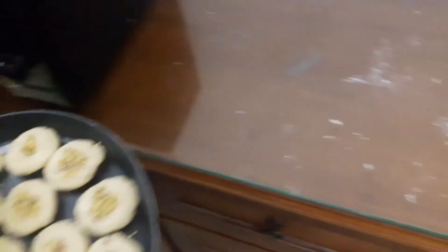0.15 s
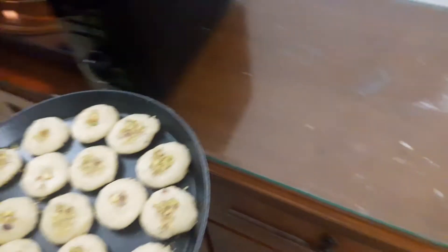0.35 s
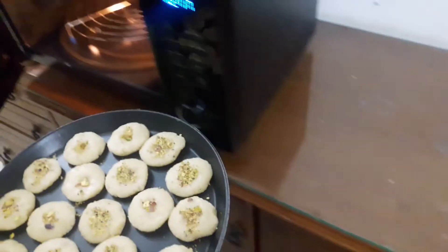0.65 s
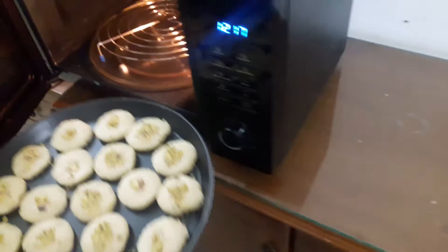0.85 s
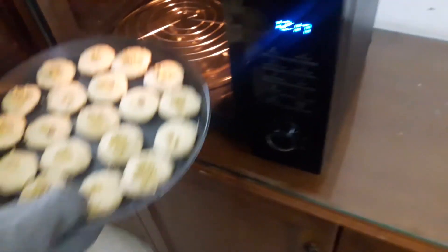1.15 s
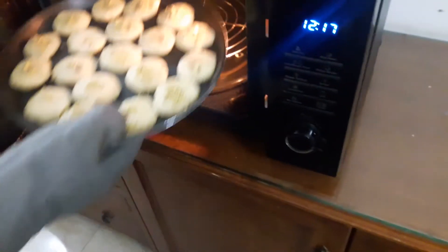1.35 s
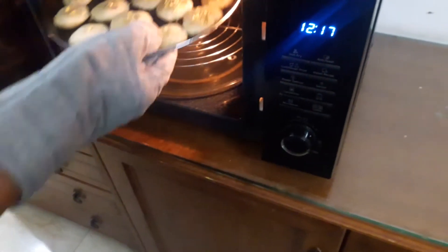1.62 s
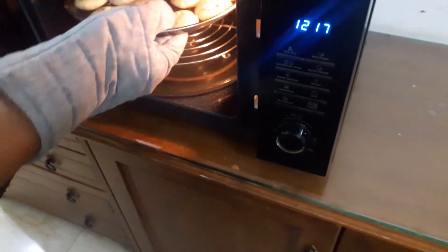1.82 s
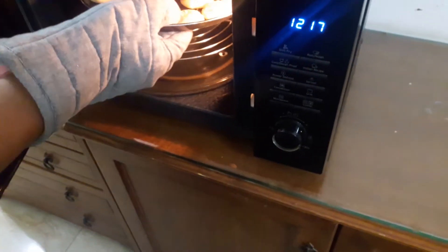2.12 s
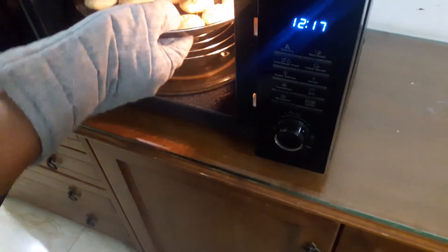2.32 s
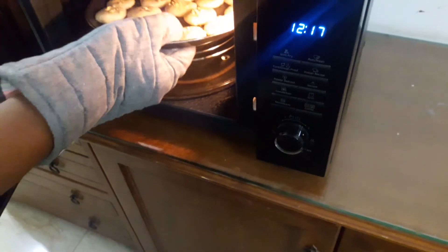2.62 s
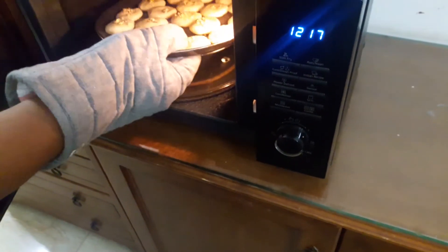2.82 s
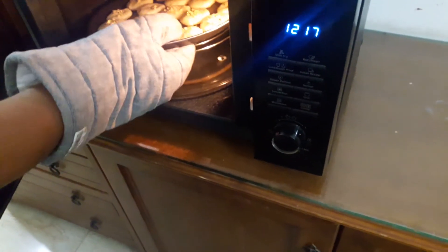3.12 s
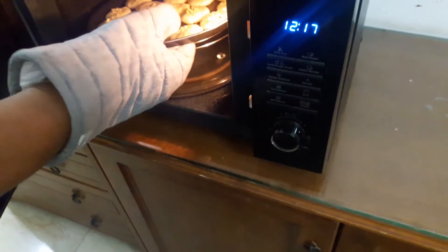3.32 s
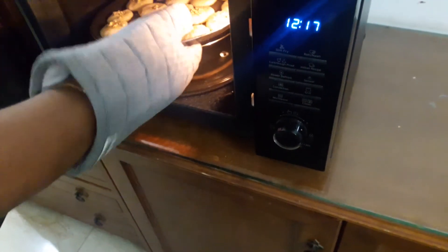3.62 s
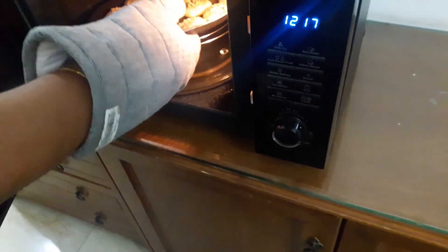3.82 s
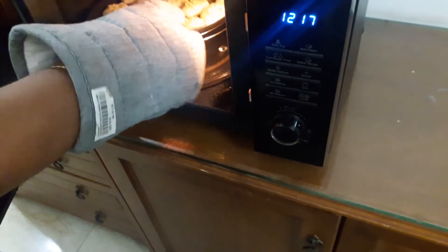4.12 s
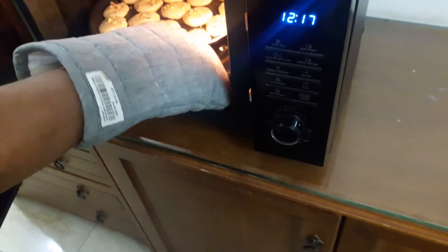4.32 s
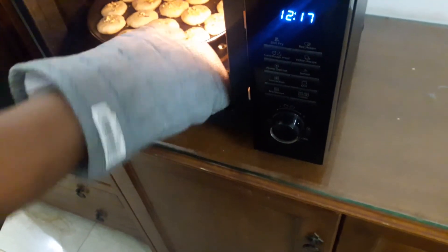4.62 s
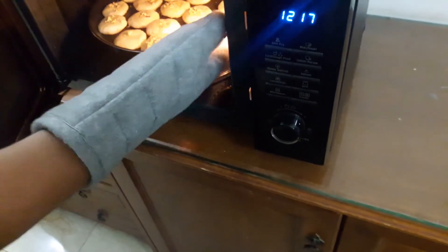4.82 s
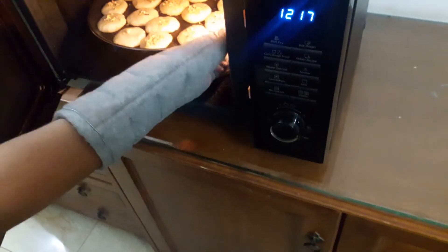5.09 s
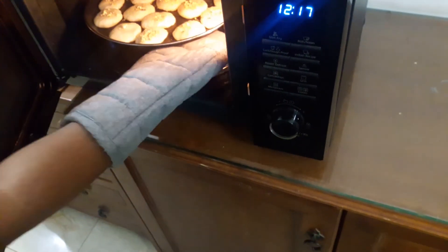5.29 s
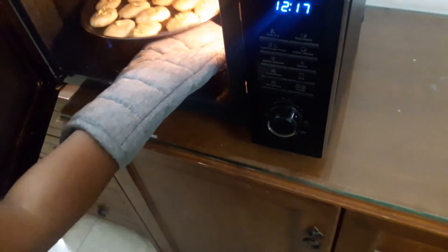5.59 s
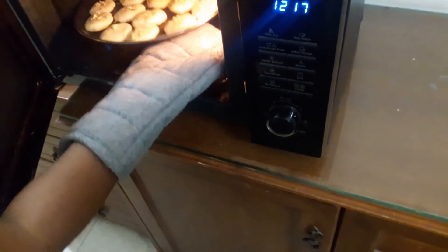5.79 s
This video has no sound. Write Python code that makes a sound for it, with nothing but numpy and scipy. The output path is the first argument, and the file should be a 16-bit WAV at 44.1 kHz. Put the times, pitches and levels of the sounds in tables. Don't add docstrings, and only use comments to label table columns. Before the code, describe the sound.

Dull hollow thumps and rustling cloth, then a metal tray knocks, clanks and scrapes onto a wire rack inside an oven in a hard-walled kitchen.

```python
import sys
import numpy as np
from scipy import signal
from scipy.io import wavfile
from scipy.ndimage import uniform_filter1d

SR = 44100
rng = np.random.default_rng(int(sys.argv[2]) if len(sys.argv) > 2 else 0)


def master_out(mix):
    frames = np.transpose(np.atleast_2d(mix))
    ceiling = np.clip(frames, -1, 1)
    pcm = np.round(ceiling * 32767).astype(np.int16)
    wavfile.write(sys.argv[1], SR, pcm)


def volts_from_decibels(level):
    exponent = np.asarray(level, float) / 20
    return 10 ** exponent


N = 262395
T = np.arange(N) / SR

# start_s, crack_db, crack_pitch_hz, clank_db, rattle_t60_s
KNOCKS = [(2.8035, -45, 2000, -25, 0.19), (2.814, -12, 4700, -36, 0.091), (2.9228, -33, 3500, -27, 0.049),
          (2.9643, -11.5, 4500, -24.5, 0.088), (3.692, -43, 5040, -43, .088),
          (3.7162, -33, 2350, -30, 0.056), (3.7258, -35, 2460, -47, 0.12), (3.7507, -41, 3480, -57, .04),
          (4.3362, -32, 2070, -37, 0.11), (4.3646, -34, 3900, -28, 0.024), (4.378, -14, 3600, -23.5, 0.019),
          (4.3852, -21, 3270, -41, 0.067), (4.3999, -26, 2270, -27, 0.044),
          (5.279, -18, 2160, -20.5, 0.086), (5.781, -39, 4750, -40, 0.027), (5.7871, -36, 3480, -33, 0.067),
          (5.7961, -36, 3580, -22, 0.086)]
# pitch_hz, level_db, t60_s
TRAY_MODES = [(382, -4, 0.25), (584, -9, 0.12), (680, -34, 0.21), (900, -16, 0.1), (980, -5, 0.27),
              (1112, -16, 0.1), (1184, 3, 0.82), (1240, 5, 0.54), (1410, -18, 0.1), (1590, -9, 0.15),
              (1900, -1, 0.19), (2190, -5, 0.1), (2270, 4, 0.18), (2300, -5, .2), (2680, -34, .12),
              (3220, -18.5, 0.22), (3480, 8, 0.14), (4200, -21, 0.14), (4500, -30, .3), (5270, -34, .15),
              (5070, -9, 0.12)]
# start_s,
# level_db, pitch_hz, width_hz, t60_s
REBOUNDS = [(.252, -39, 500, 500, .06), (.303, -40, 5500, 2000, .02), (.4265, -42, 2200, 600, 0.017),
            (.427, -33, 500, 600, .03), (.8935, -30, 4000, 2500, .05), (4.366, -31, 400, 250, 0.068),
            (4.384, -24, 327, 251, 0.085), (5.782, -33, 4840, 900, .03), (2.344, -50, 990, 900, 0.036),
            (2.8178, -11, 4430, 2450, .035), (2.85, -33, 4960, 1500, .05), (2.875, -36, 3300, 900, .04),
            (2.931, -29, 3100, 1200, 0.059), (3.0043, -28, 2630, 1800, .04), (3.012, -36, 4600, 1200, .04),
            (3.687, -48, 3500, 600, .05), (3.6908, -42.5, 1000, 500, 0.091),
            (3.7135, -35, 2200, 1500, 0.022), (3.7235, -29.5, 900, 900, 0.02),
            (3.728, -30.5, 1300, 1500, 0.034), (3.747, -42, 1300, 900, .04),
            (3.775, -44.5, 1300, 700, 0.05), (4.33, -39, 1100, 900, .04), (4.3443, -33, 2100, 600, .04),
            (4.358, -33, 1100, 600, 0.035), (4.392, -26, 3300, 700, 0.029), (4.402, -34, 1150, 500, .05),
            (4.41, -34.5, 3520, 600, 0.044), (4.428, -32, 2280, 700, 0.045), (4.445, -38, 3270, 900, 0.037),
            (5.283, -22, 2500, 3500, 0.019), (5.768, -40.5, 600, 400, 0.054),
            (5.7875, -25, 950, 700, 0.027), (5.79, -33, 2290, 600, 0.038), (5.7975, -29, 1290, 2450, 0.016),
            (5.834, -46, 3500, 500, 0.034), (.828, -47, 1400, 1400, .15), (4.387, -22, 3500, 900, .04),
            (5.085, -50, 1500, 1200, .08)]
# start_s, pitch_hz, level_db, t60_s
WIRES = [(.11, 3400, -54.5, 0.17), (0.13, 6300, -49, 0.07), (2.814, 1112, -28, 0.14),
         (2.966, 4500, -43, 0.22), (2.817, 2270, -32.5, 0.13), (2.818, 3310, -32, 0.13),
         (2.818, 4560, -27.5, 0.09), (2.966, 3060, -34, 0.083), (2.925, 1500, -45, .08),
         (3.716, 1750, -45, 0.064), (3.716, 4300, -49, .08), (3.69, 4950, -47, .08),
         (3.721, 1179, -46, 0.32), (3.73, 1410, -53, 0.33), (4, 790, -59, 0.072), (3.72, 985, -45, 0.19),
         (4.366, 3920, -26.5, 0.035), (4.38, 3620, -23.5, 0.038), (4.38, 2261, -41, 0.3),
         (4.365, 630, -38, 0.47), (4.385, 3144, -40, .24), (4.38, 921, -47, 0.61),
         (4.39, 3413, -43.5, 0.32), (4.38, 2700, -38, 0.34), (3.72, 436, -45.5, .3),
         (3.72, 2283, -52, 0.23), (3.72, 3456, -49, .17), (3.73, 3500, -53, .12), (3.755, 4958, -54, .1),
         (5.8, 1300, -43, .6), (5.79, 2000, -41, .2), (5.868, 2300, -50, .3), (5.79, 3500, -44, .2),
         (3.69, 2300, -50, .08), (3.675, 1400, -52, .12), (2.83, 5500, -42, .2), (2.84, 3320, -42, .2),
         (2.98, 2650, -42, .2), (5.283, 2250, -44, .25), (5.283, 3500, -44, .2), (5.81, 300, -42, 0.17),
         (5.8, 330, -43, 0.18), (5.33, 1350, -47.5, 0.28), (4.38, 1179, -36.5, 0.29),
         (4.383, 377, -34.5, 0.3), (5.279, 1270, -33.5, 0.071), (5.786, 5000, -43, 0.057),
         (5.8, 1227, -38.5, 0.59), (5.796, 2050, -58, 0.15), (5.797, 3600, -36, 0.035),
         (5.798, 390, -39.5, 0.21), (5.798, 1712, -38, 0.096), (4.385, 1577, -43, 0.16)]
# start_s, held_s, scrape_db, cavity_db, clank_db
SLIDES = [(2.829, 0.0034, -38.5, -38, -36), (2.888, 0.04, -54, -36, -49), (2.956, 0.065, -47, -40.5, -42),
          (3.55, 0.11, -68, -66.5, -63.5), (3.69, 0.015, -64, -68, -52), (3.714, 0.028, -65, -49.5, -56),
          (3.85, 0.055, -71, -73, -71), (4.335, 0.015, -41.5, -38.5, -35),
          (4.365, 0.0052, -40.5, -33.5, -41), (4.43, .01, -56, -45.5, -52),
          (5.295, 0.0026, -68, -41.5, -43.5), (5.41, .12, -67, -56.5, -63.5),
          (5.799, 0.0024, -58, -40, -42.5), (5.87, 0.1, -67, -73, -67)]
# pitch_hz, density_db_per_hz
CLANK_COLOUR = [(350, -26.5), (600, 1.5), (786, -8.5), (922, 0), (1050, -6), (1140, -2.5), (2600, -16.5),
                (3380, -68), (5720, -120)]
# pitch_hz, density_db_per_hz
SCRAPE_COLOUR = [(1410, -61), (2400, 3.5), (3380, 5), (3930, 2), (5310, 4.5), (6670, -14), (8300, -31),
                 (10800, -48), (18300, -120)]
# pitch_hz, width_hz, level_db
RACK_WIRES = [(2270, 58, 6), (2480, 60, -8), (3020, 57, -7), (3500, 42, 0), (3750, 16, -4), (4470, 80, -5),
              (5100, 40, -8)]
# pitch_hz, width_hz, level_db
CAVITY = [(94, 36, -10), (153.5, 10.8, 4), (213.7, 46.6, 1), (252.6, 25, -8), (320, 39, 1.5), (383, 41, -2),
          (488, 71, -10), (618.5, 38, -10.5)]
# start_s, level_db, pitch_hz, fizz_share, t60_s
TICKS = [(0.108, -31.5, 5430, 0.61, 0.088), (0.24, -37.5, 3850, 0.46, 0.051),
         (0.304, -32, 5400, 0.56, 0.033), (0.426, -41, 4600, .4, 0.025), (.482, -32, 4220, 0.4, 0.024),
         (0.548, -32, 5300, 0.3, 0.052), (0.8897, -10, 3690, 0.034, 0.053), (2.268, -52, 3750, .5, 0.073),
         (2.345, -49.5, 2180, .5, 0.047), (2.701, -52, 5600, .7, 0.094), (5.768, -52, 900, .6, 0.059),
         (2.517, -50, 5430, 0.54, 0.1), (2.703, -45, 3730, .7, 0.42), (3.335, -71, 4500, .6, 0.032),
         (4.893, -51, 4330, .5, 0.038), (5.241, -42.5, 3400, .5, 0.055)]
# start_s, held_s, force_db, fall_db_per_s, hardness_db
THUMPS = [
    (.0, 0.022, -54, 350, -9),
    (.1, .004, -62, 1200, -21),
    (0.25, 0.0079, -35, 112, -6),
    (0.421, 0.011, -29.5, 111, -6.5),
    (0.449, 0.0053, -36.5, 143, -10.5),
    (.645, 0.0084, -53, 199.5, -4),
    (.8, 0.02, -44, 200, -6),
    (0.829, 0.032, -34, 300, -3.5),
    (0.874, 0.036, -23.5, 95, -7),
]
# pitch_hz, width_hz, level_db
THUMP_BODY = [(122.6, 36, -20), (154, 14, -5.5), (221.5, 28, 1), (280, 67, -2), (361, 25, -4.5),
              (433, 18, -21.5), (557, 162, 1.5), (660, 140, -14)]
# pitch_hz, level_db
THUMP_TOP = [(300, -40.5), (500, 8.5), (900, 0), (1500, -12.5), (2500, -22.5), (5000, -49.5)]
# start_s, held_s, level_db
BOOMS = [
    [(.262, 0.022, -49.5), (.39, .03, -51.5), (.455, 0.18, -45), (.845, 0.18, -42.5), (1.3, 0.016, -55)],
    [(.285, 0.05, -48), (.46, 0.024, -44), (.65, .01, -67), (.848, 0.14, -39.5), (1.21, 0.083, -63)],
]
BOOM_HZ = [112.7, 230.2]
# start_s, effort_db, silkiness_db
CLOTH = [(0., -59.5, 0), (.22, -58.5, -4.5), (.4, -50.5, -5.5), (.72, -57, 2), (.92, -46, -9),
         (1.02, -54, -6), (1.42, -74, -21), (1.75, -72.5, -6), (2.62, -75, -3), (3.2, -62.5, 1),
         (3.38, -68, -4), (3.67, -53, -0.5), (4.06, -70, -4.5), (4.32, -57, -0.5), (4.85, -93, -7),
         (5.33, -52.5, -0.5), (5.74, -64.5, -3.5), (5.8, -69, -1)]
# start_s, level_db, rise_db_per_s, fall_db_per_s, silkiness_db
BRUSHES = [
    (.24, -69, 1200, 124, -18),
    (.308, -64, 400, 202, -3),
    (1.28, -45.5, 79, 179, 3.5),
    (1.516, -56, 152, 100, 0),
    (3.328, -68, 399, 184, -4),
    (4.932, -64, 46, 186, -1.5),
    (5.057, -55, 900, 72, 1.5),
    (5.1, -55, 207, 400, 3.5),
]
# pitch_hz, density_db_per_hz
CLOTH_COLOUR = [(710, -57.5), (1200, -11.5), (1730, -11), (1980, -11.5), (2650, -11), (3830, -1), (5200, 2),
                (6760, -33), (11400, -120)]
# pitch_hz, density_db_per_hz
CLOTH_EDGE = [(2880, -34.5), (4900, 6.5), (6370, -5), (7160, -11.5), (8080, -31.5), (8300, -31),
              (10800, -55.5), (18300, -120)]
# pitch_hz, density_db_per_hz
FIZZ_COLOUR = [(4710, -43), (8000, -4.5), (8830, -1.5), (10500, -8.5), (14900, 1.5), (16000, -1)]
# start_s, held_s, level_db
SQUEAK = [
    (.28, .003, -70),
    (.326, 0.055, -69),
    (.4, 0.13, -85),
]
# pitch_hz, density_db_per_hz
HUM = [(15, -55), (25, -18), (64, -16.5), (97, 0.5), (185, -7), (223, -7), (503, -9), (575, -13.5),
       (863, -15), (988, -13.5), (1330, -20), (3520, -32.5), (4250, -34), (7310, -54.5), (16000, -41.5)]
# pitch_hz, width_hz, level_db
HUM_LINES = [(228.7, 25, 0)]
# pitch_hz, density_db_per_hz
APART = [(18, -67), (30, -31), (59, -32), (115, -2), (499, -3), (4080, -13), (7470, -30.5), (11700, -29.5),
         (12600, -25), (16000, -31)]
# pitch_hz, t60_s
ROOM = [(100, 1), (250, 0.51), (700, 0.9), (2000, 0.78), (5000, 0.62), (12000, 0.85)]
# pitch_hz, level_db
MICROPHONE = [(40, 1), (100, 8.5), (5000, 2.5), (6500, -0.5), (7900, -17), (9000, -27), (15500, -42)]

FIZZ_DB_PER_OCTAVE = 7


def evened(x):
    return x / np.sqrt(np.mean(x ** 2) + 1e-20)


def peaked(x):
    return x / abs(x).max()


def read(points, hz):
    f, value = np.transpose(points)
    return np.interp(np.log(hz + 1), np.log(f + 1), value)


def add(mix, start_s, sound):
    part = mix[round(start_s * SR):][:len(sound)]
    part += sound[:len(part)]


def colour(x, points):
    level_db = read(points, abs(np.fft.fftfreq(8192, 1 / SR)))
    log_gain = np.log(volts_from_decibels(np.maximum(level_db, -100)))
    taps = np.fft.ifft(np.exp(np.conj(signal.hilbert(log_gain)))).real[:4096]
    return signal.oaconvolve(x, taps / np.linalg.norm(taps))[:len(x)]


def resonate(x, hz, width):
    return signal.lfilter(*signal.iirpeak(hz, hz / width, SR), x)


def body(x, peaks):
    return evened(sum(volts_from_decibels(db) * resonate(resonate(x, hz, 2 * w), hz, 2 * w) for hz, w, db in peaks))


def grit(per_s, spread_db):
    size = volts_from_decibels(spread_db * np.minimum(rng.exponential(1, N), 4)) * rng.choice([-1., 1.], N)
    return evened(size * (rng.random(N) < per_s / SR))


def swells(start_s, held_s, db, rise_db_s, fall_db_s):
    t = T[::32, None]
    rise = rise_db_s * np.maximum(start_s - t, 0)
    fall = fall_db_s * np.maximum(t - start_s - held_s, 0)
    gain = volts_from_decibels(db - rise - fall).sum(axis=1)
    return uniform_filter1d(np.interp(T, t[:, 0], gain), size=150)


def ring():
    t = T[:SR // 2]
    strike = rng.standard_normal((len(TRAY_MODES), 2))
    out = np.zeros(len(t))
    for (hz, db, t60), (share, detune) in zip(TRAY_MODES, strike):
        fade = volts_from_decibels(db + 2.0 * share - 60 * t / t60)
        out += fade * np.sin(2 * np.pi * hz * (1 + 0.00424 * detune) * t)
    return out


def knocks():
    out, fizz, t = np.zeros(N), np.zeros(N), T[:SR // 2]
    for start_s, crack_db, hz, clank_db, t60 in KNOCKS:
        rattle = volts_from_decibels(-60 * t / np.clip(t60, .01, .3)) * np.minimum(t / .0012, 1)
        contact = rng.standard_normal((3, len(t))) * rattle
        crack = resonate(contact[0], hz, 870.0) + 0.37 * resonate(contact[0], 4000.0, 3400.0)
        sheet = resonate(resonate(contact[1], 1240.0, 3000.0), 1300.0, 3100.0)
        modes = signal.fftconvolve(contact[1, :2000], ring())[:len(t)]
        clank = peaked(sheet) + 0.091 * peaked(modes)
        push = sum(volts_from_decibels(db) * resonate(contact[2], f, 2.5 * w) for f, w, db in CAVITY[2:])
        add(out, start_s, volts_from_decibels(crack_db) * peaked(crack) + volts_from_decibels(clank_db) * clank
            + volts_from_decibels(clank_db - 12.5) * peaked(push))
        fizz_db = -20 + 0.82 * crack_db + FIZZ_DB_PER_OCTAVE * np.log2(hz / 4000)
        add(fizz, start_s, volts_from_decibels(fizz_db - 60 * t / 0.095) * contact[0])
    return colour(out, MICROPHONE) + colour(fizz, FIZZ_COLOUR)


def rebounds():
    out, t = np.zeros(N), T[:SR // 8]
    for start_s, db, hz, width, t60 in REBOUNDS:
        rattle = rng.standard_normal(len(t))
        bounce = (rattle + 4.0 * (t == 0)) * volts_from_decibels(-60 * t / np.clip(t60, .005, .2))
        bounce = resonate(resonate(bounce, hz, 1.5 * width), hz, 1.5 * width)
        add(out, start_s, volts_from_decibels(db) * peaked(bounce))
    return volts_from_decibels(-5.5) * colour(out, MICROPHONE)


def wires():
    out, t = np.zeros(N), T[:SR // 2]
    for start_s, hz, db, t60 in WIRES:
        pair = np.sin(2 * np.pi * hz * t) + .3 * np.sin(2 * np.pi * 1.012 * hz * t)
        add(out, start_s, volts_from_decibels(db - 60 * t / t60) * np.minimum(t / 0.0012, 1) * pair)
    return out


def slides():
    rise_db_s = 2500
    slips = grit(5000, 1.2)
    start_s, held_s, scrape_db, cavity_db, clank_db = np.transpose(SLIDES)
    clank = swells(start_s, held_s, clank_db, rise_db_s, 182) * slips
    modes = ring()
    rung_tray = signal.oaconvolve(clank, modes / np.linalg.norm(modes))[:N]
    clank = colour(clank, CLANK_COLOUR) + 0.13 * rung_tray
    scrape = swells(start_s, held_s, scrape_db, rise_db_s, 241) * slips
    rung_wires = body(scrape, RACK_WIRES) * np.std(scrape)
    fizz = volts_from_decibels(-25) * colour(scrape, FIZZ_COLOUR)
    scrape = colour(scrape, SCRAPE_COLOUR) + 0.42 * rung_wires + fizz
    cavity = swells(start_s, held_s, cavity_db, rise_db_s, 121) * body(grit(1200, 3.4), CAVITY)
    return clank + scrape + cavity


def ticks():
    out, fizz, t = np.zeros(N), np.zeros(N), T[:SR // 8]
    for start_s, db, hz, share, t60 in TICKS:
        contact = share * rng.standard_normal(len(t)) * volts_from_decibels(-60 * t / np.clip(t60, .005, .2)) + (t == 0)
        tick = resonate(resonate(contact, hz, 3500.), hz, 3500.) + .1 * contact
        add(out, start_s, volts_from_decibels(db) * peaked(tick))
        add(fizz, start_s, volts_from_decibels(db - 24) * contact)
    return colour(out, MICROPHONE) + colour(fizz, FIZZ_COLOUR)


def thumps():
    rise_db_s = 3500
    start_s, held_s, force_db, fall_db_s, hardness_db = np.transpose(THUMPS)
    first_blow = 3.0 * np.isin(np.arange(N), np.round(start_s * SR))
    lumps = grit(900, 1.9) + first_blow
    pushes = swells(start_s, held_s, force_db, rise_db_s, fall_db_s) * lumps
    sounding = sum(volts_from_decibels(db) * resonate(pushes, hz, w) / np.sqrt(w) for hz, w, db in THUMP_BODY)
    low = volts_from_decibels(31) * signal.lfilter(*signal.butter(3, [95, 900], "band", fs=SR), sounding)
    hard = swells(start_s, held_s, force_db + hardness_db, rise_db_s, fall_db_s) * lumps
    return low + colour(hard, THUMP_TOP)


def booms():
    out = np.zeros(N)
    for events, hz in zip(BOOMS, BOOM_HZ):
        drift = uniform_filter1d(rng.standard_normal(N), size=1500)
        waver = evened(uniform_filter1d(drift, size=1500))
        tone = np.sin(2 * np.pi * np.cumsum(hz * (1 + 0.0194 * waver)) / SR)
        out += np.sqrt(2) * swells(*np.transpose(events), 351, 155) * tone
    return out


def cloth():
    fibres = grit(9000, 2.0)
    move_s, effort_db, slow_silk_db = np.transpose(CLOTH)
    start_s, db, rise_db_s, fall_db_s, silk_db = np.transpose(BRUSHES)

    def rubbing(silk):
        slow = volts_from_decibels(np.interp(T, move_s, effort_db + silk * slow_silk_db))
        return slow + swells(start_s, 0, db + silk * silk_db, rise_db_s, fall_db_s)

    plain, silky = rubbing(0), rubbing(1)
    return (plain * colour(fibres, CLOTH_COLOUR) + silky * colour(fibres, CLOTH_EDGE)
            + volts_from_decibels(-17.5) * silky * colour(fibres, FIZZ_COLOUR))


def squeak():
    hz = 11230 - 345 * np.exp(-np.maximum(T - .25, 0) / .07)
    flutter = 1 + .25 * evened(uniform_filter1d(rng.standard_normal(N), 600))
    level = swells(*np.transpose(SQUEAK), 800, 800)
    return 1.3 * level * flutter * np.sin(2 * np.pi * np.cumsum(hz) / SR)


def hum():
    air = colour(rng.standard_normal(N), HUM)
    return volts_from_decibels(-57) * (air + 0.42 * body(rng.standard_normal(N), HUM_LINES))


def room(x):
    taps = np.zeros(SR)
    at = np.arange(200, SR - 20, 20) + rng.integers(0, 20, (SR - 201) // 20)
    taps[at] = rng.choice([-1., 1.], len(at))
    hz, t, z = signal.stft(taps, SR, nperseg=256)
    tail = signal.istft(z * volts_from_decibels(-60 * t / read(ROOM, hz)[:, None]), SR, nperseg=256)[1]
    return signal.fftconvolve(x, tail / np.linalg.norm(tail))[:N]


def scene():
    hits = (knocks() + ticks()) * volts_from_decibels(-7.0) + wires()
    rubs = thumps() + slides()
    bounces = rebounds()
    mid = hits + volts_from_decibels(-10.0) * room(hits)
    mid = mid + rubs + volts_from_decibels(-9.0) * room(rubs)
    mid = mid + bounces + volts_from_decibels(-11.0) * room(bounces)
    mid = mid + booms() + cloth() + squeak() + hum()
    side = volts_from_decibels(-73) * colour(rng.standard_normal(N), APART)
    return np.array([mid + side, mid - side])


def top_cut(x):
    return signal.sosfilt(signal.butter(12, 16650, fs=SR, output="sos"), x)


def record(dry):
    mid_side = np.array([dry[0] + dry[1], dry[0] - dry[1]]) / 2
    hz, t, (mid, side) = signal.stft(mid_side, SR, nperseg=2048)
    loud, faint = (uniform_filter1d(abs(z) ** 2, size=16, axis=0) for z in (mid, side))
    side = side * (loud < faint * volts_from_decibels(2 * 22.0))
    both = np.array([mid + side, mid - side]) * (hz < 15850)[:, None]
    mix = signal.istft(both, SR, nperseg=2048)[1][:, :N]
    return top_cut(mix)


dry = scene()
out = record(dry)
master_out(out)
```